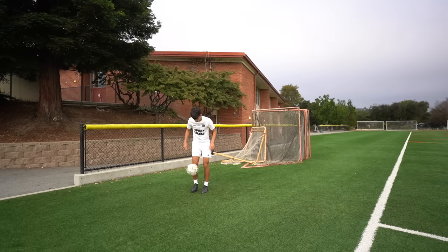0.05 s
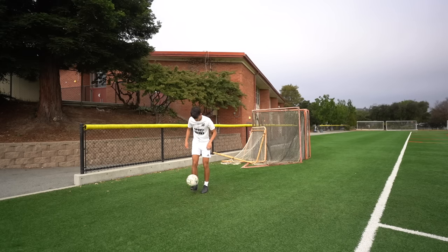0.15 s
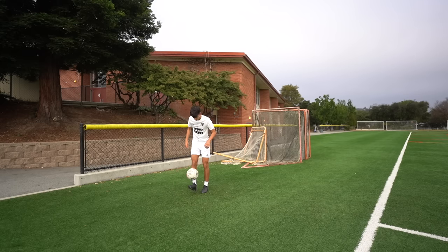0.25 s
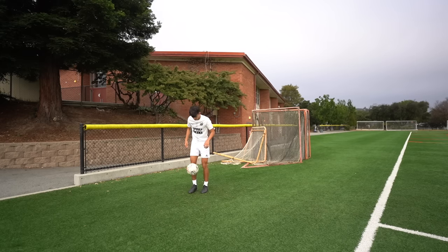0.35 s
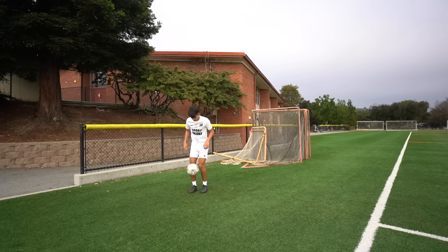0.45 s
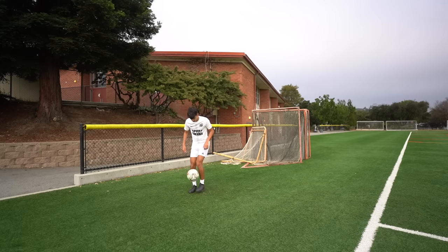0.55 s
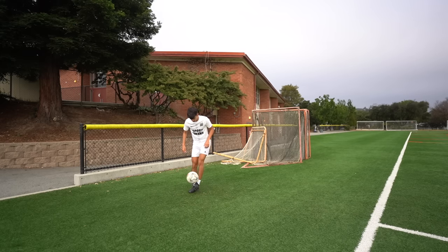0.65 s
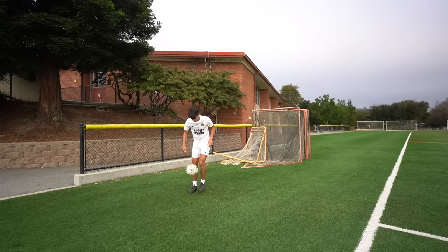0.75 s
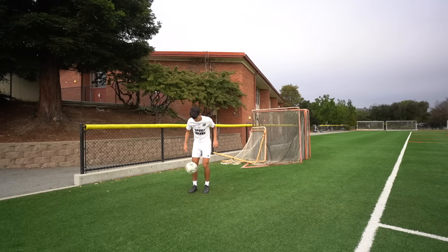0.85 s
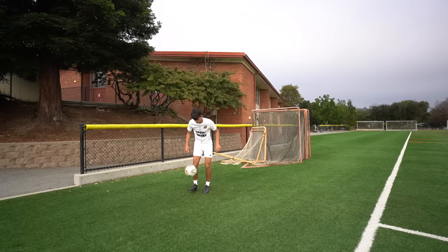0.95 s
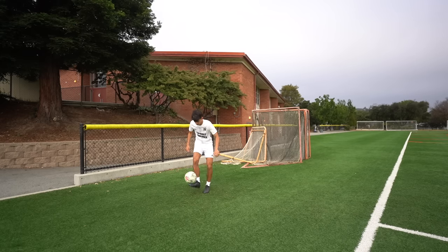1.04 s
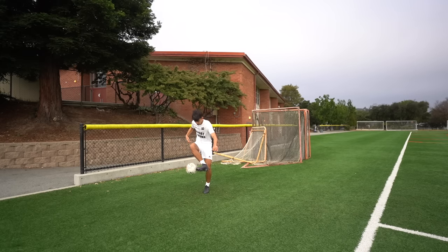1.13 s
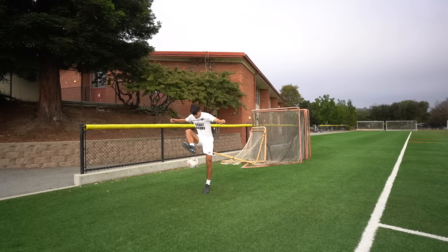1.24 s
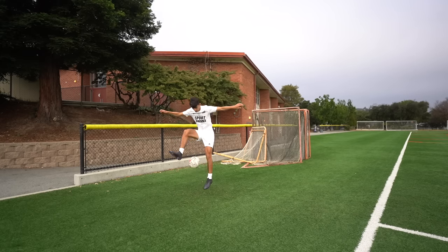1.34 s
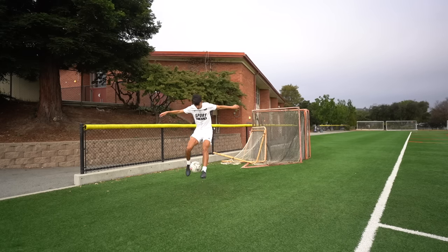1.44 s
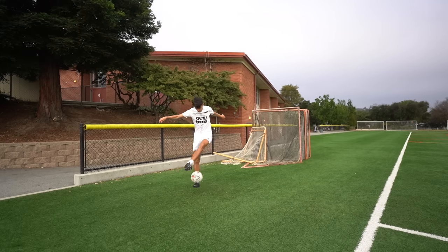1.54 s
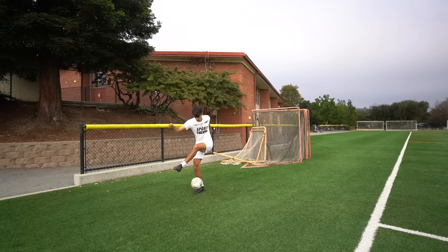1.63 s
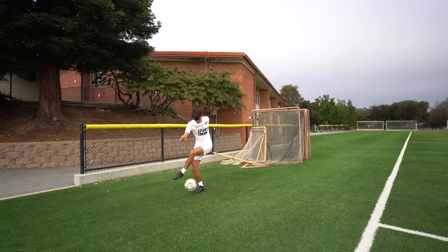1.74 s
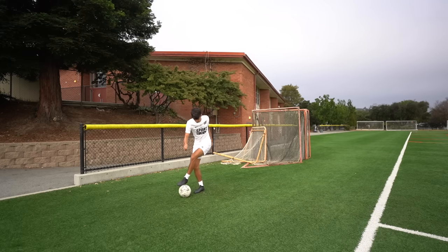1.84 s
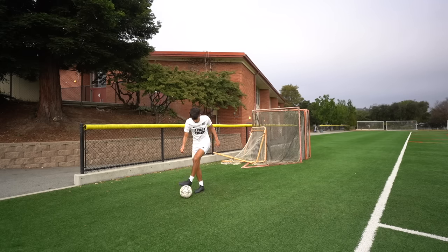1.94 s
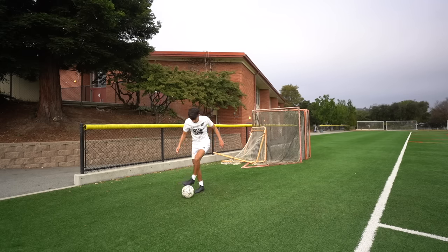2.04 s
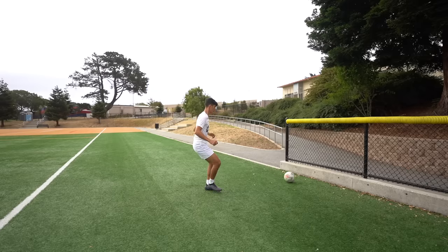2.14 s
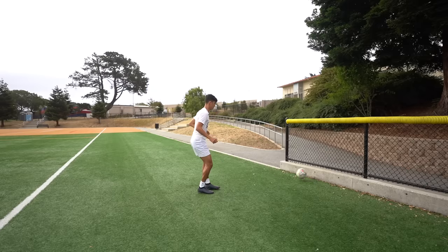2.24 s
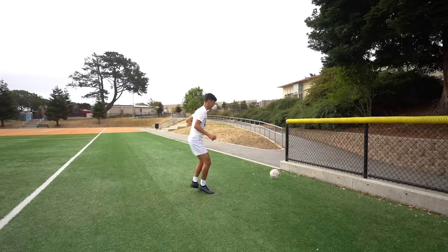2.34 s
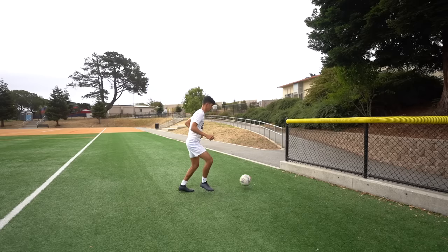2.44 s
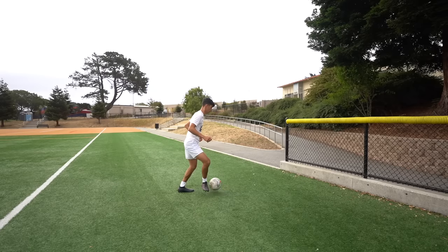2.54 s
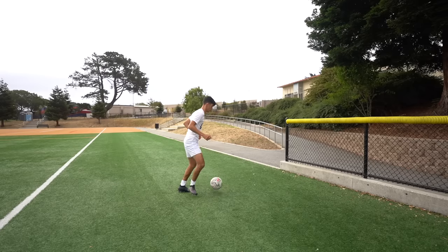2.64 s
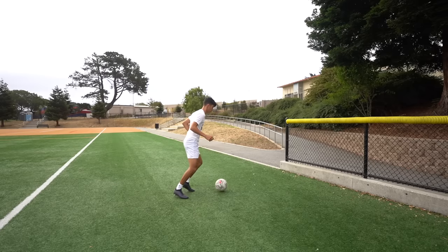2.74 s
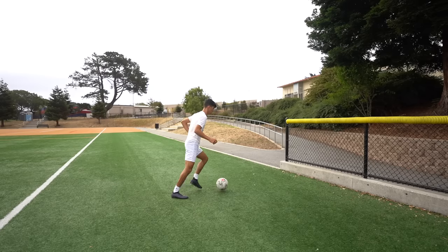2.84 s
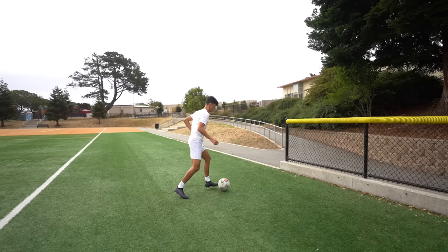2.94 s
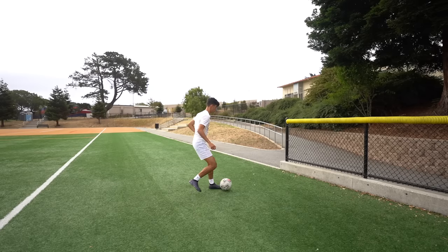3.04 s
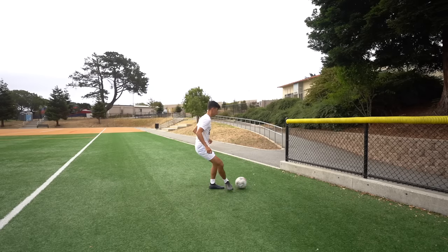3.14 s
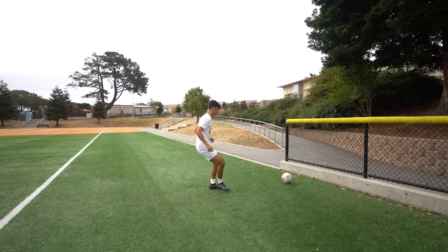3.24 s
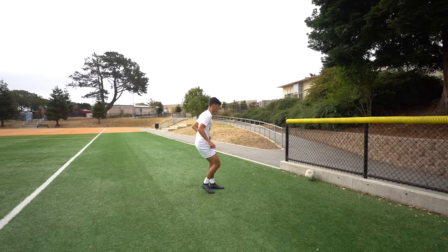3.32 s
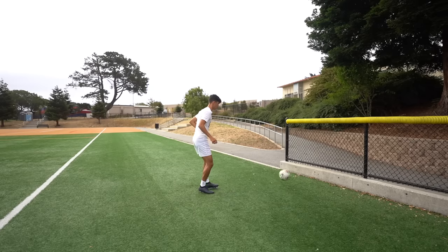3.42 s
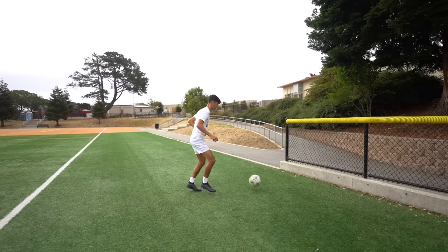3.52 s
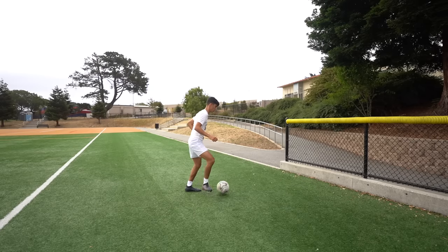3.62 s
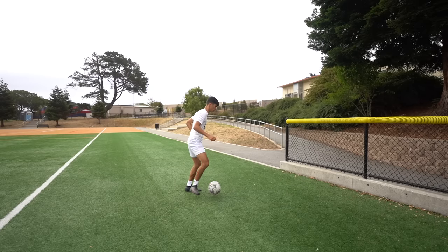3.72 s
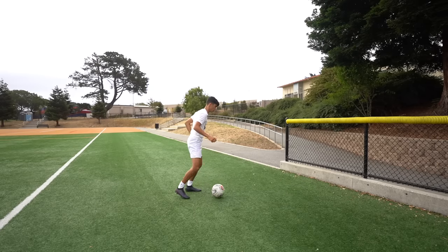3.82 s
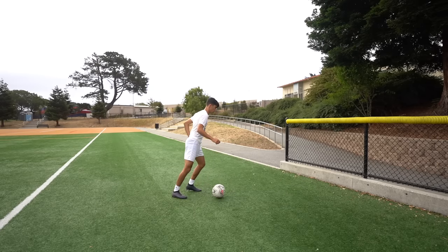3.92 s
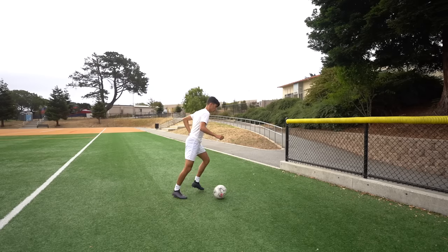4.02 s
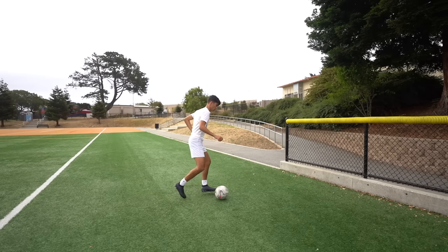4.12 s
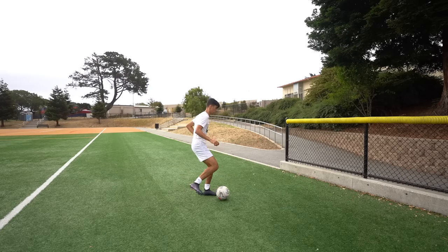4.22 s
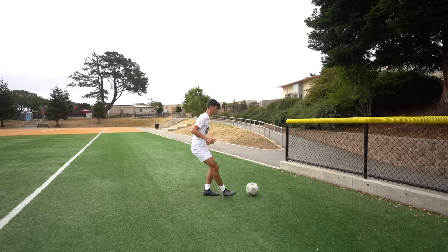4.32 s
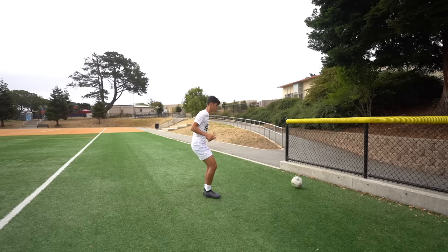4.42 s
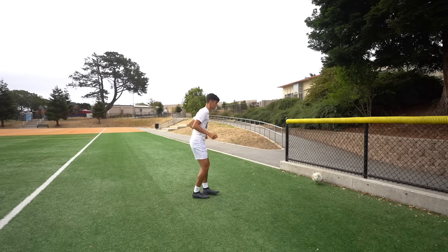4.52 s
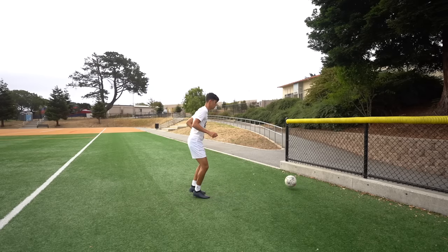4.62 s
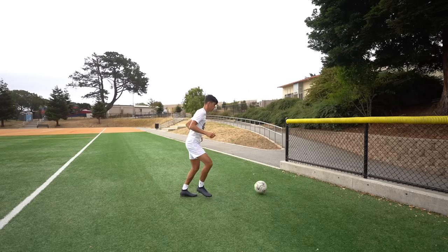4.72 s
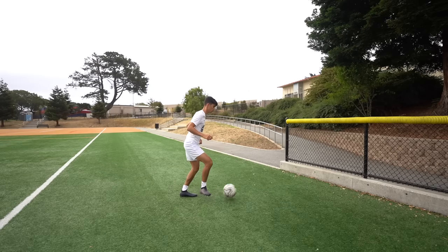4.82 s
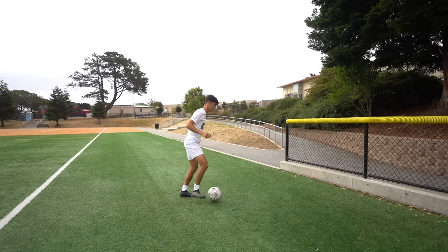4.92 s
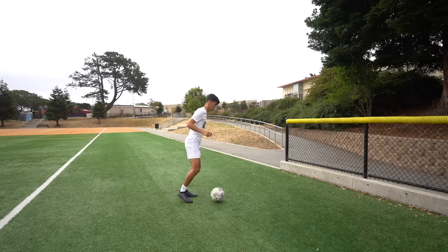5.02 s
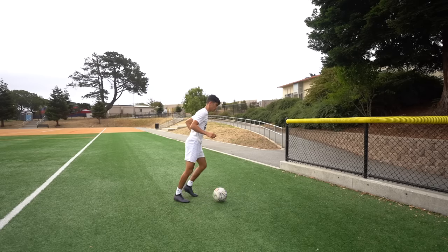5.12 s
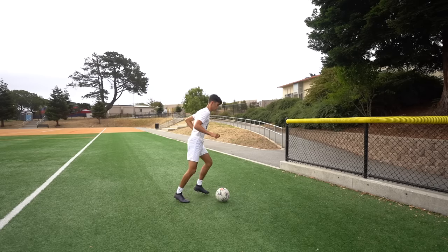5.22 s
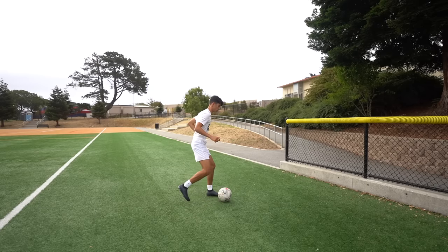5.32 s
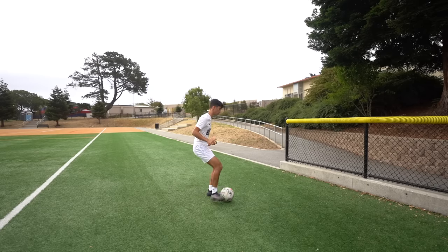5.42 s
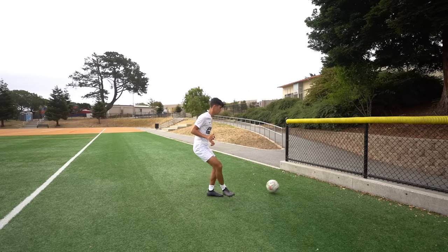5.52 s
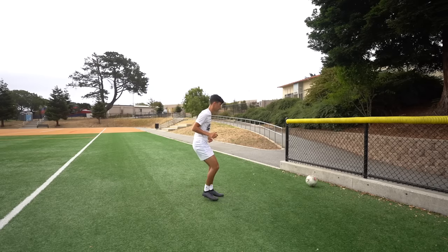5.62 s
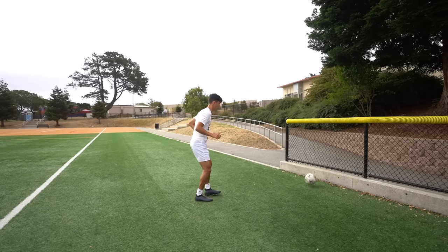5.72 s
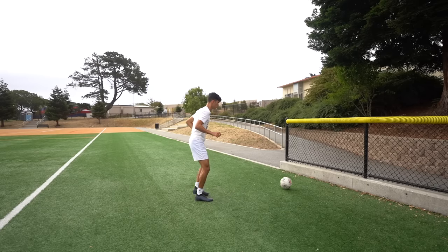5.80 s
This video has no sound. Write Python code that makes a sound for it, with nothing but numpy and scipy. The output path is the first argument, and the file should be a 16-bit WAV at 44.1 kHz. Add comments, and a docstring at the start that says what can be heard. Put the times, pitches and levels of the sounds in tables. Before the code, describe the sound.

For the first two seconds, low gusts of wind buffet the microphone on an outdoor pitch while clothes rustle faintly. A soccer ball is juggled with quiet, bright taps at about 0.2, 0.7, 1.1, 1.7 and 1.9 seconds. At 2.1 seconds the wind stops abruptly and much louder passing begins. The ball smacks a concrete kerb to the right at about 2.3, 3.4, 4.6 and 5.7 seconds, each time setting a chain-link fence ringing very faintly. Nearer the centre, a foot traps the rebounds at 2.6, 3.7 and 4.9 seconds and kicks the ball back at 3.2, 4.3 and 5.5 seconds. Each contact is a sharp crack with a low thump and a short hollow ring. Between them, shoes and ball softly brush and crunch the artificial turf. A faint murmur of distant traffic continues throughout.

```python
"""A soccer ball is juggled on artificial turf in gusty wind; then, after a cut to a second spot, it is
passed against a concrete kerb under a chain-link fence and trapped on each rebound. Every contact is
a crack of the skin, a thump of the flattening ball and a short ring of its air and shell. The fence
rings faintly; shoes and ball brush plastic blades and crunch the infill. Gusts buffet the microphone
and clothes rustle during the juggling only; a distant town murmurs throughout."""
import sys
import numpy as np
from scipy import signal
from scipy.fft import rfft, irfft
from scipy.io import wavfile
from scipy.ndimage import uniform_filter1d

SR = 44100
rng = np.random.default_rng(int(sys.argv[2]) if len(sys.argv) > 2 else 0)


def wav_record(signal):
    """Record a signal, one row per channel, as 16-bit PCM in the file named by sys.argv[1]."""
    frames = np.transpose(np.atleast_2d(signal))
    bounded = np.clip(frames, -1, 1)
    # unit amplitude maps onto the largest positive 16-bit level
    quanta = np.round(bounded * 32767).astype(np.int16)
    wavfile.write(sys.argv[1], SR, quanta)


N = 258426
TIME = np.arange(N) / SR
AGE = TIME[:SR // 2]  # seconds since a contact
CUT_S = 2.107  # juggling ends, passing begins

# ball on the kerb: start_s, crack_db, centre_hz, treble_db, thump_db, thump_hz, pan_db
REBOUNDS = [(2.2682, -2.5, 2180, 1, -18, 128, -9.0), (3.376, -3, 2230, 0, -17.5, 133.2, -11),
            (4.5652, -4.5, 2350, 2.5, -17.5, 137, -13.5), (5.7334, -2, 2200, 1.5, -18.5, 128, -10)]


def juggling():
    """Light touches keep the ball up: quiet, bright ticks with only the highest fizz rolled off."""
    # start_s, crack_db, centre_hz, treble_db, thump_db, thump_hz, pan_db
    juggles = [(.2261, -23, 3300, 9, -33, 122, 0), (.676, -21, 1960, 10, -27.5, 116, -1),
               (1.1044, -17, 1760, 6, -40, 124, -1), (1.668, -27, 3100, 7, -37.5, 152, 0),
               (1.897, -30.5, 2940, 19, -50, 125, -2)]
    taps = touches(juggles, crack_db=2.5, thump_db=1.5, modes_db=2, snap_db=4, echo_s=0.0264,
                   echo_db=-25, peel_db=-51, scatter_db=-36, scatter_t60=0.16, low_pan_db=6, width=0.5)
    return signal.sosfilt(signal.butter(1, 8000, fs=SR, output="sos"), taps)


def passing():
    """The foot passes and traps the ball, and its panels flap."""
    # start_s, crack_db, centre_hz, treble_db, thump_db, thump_hz, pan_db
    kicks = [(2.6156, -8, 2540, 2.5, -25.5, 106, -3), (3.176, -4.5, 1600, 4.5, -19, 109, -3),
             (3.7196, -7, 1790, 4.5, -23.5, 107.7, -2.5), (4.3329, -5, 3180, 6, -16, 108, -3),
             (4.9318, -6.5, 1720, -3.5, -24.5, 110.6, -2), (5.4936, -5.5, 1510, 0.5, -19.5, 106, -4.5)]
    hits = touches(kicks, crack_db=0.5, thump_db=8, modes_db=-6, snap_db=-9, echo_s=.029, echo_db=-13,
                   peel_db=-39.5, scatter_db=-51, scatter_t60=0.53, low_pan_db=-1.5, width=0.28)
    return hits + leather(kicks, db=-14, length_s=0.0086)


def kerb_hits():
    """The ball smacks into concrete, off to the right."""
    return touches(REBOUNDS, crack_db=-4.5, thump_db=9.5, modes_db=-4.5, snap_db=-7, echo_s=.018,
                   echo_db=-13.5, peel_db=-32, scatter_db=-43.5, scatter_t60=0.45, low_pan_db=-3.5,
                   width=0.5)


def touches(table, crack_db, thump_db, modes_db, snap_db, echo_s, echo_db, peel_db, scatter_db,
            scatter_t60, low_pan_db, width):
    """Layer a crack, inner ring and thump per contact; their dB settings trim the table's levels."""
    # air and shell of the ball: pitch_hz, level_db, t60_s
    ball_modes = [(201.2, -21, 0.18), (277.2, -13.5, 0.089), (365, -13, 0.015), (435, -16.5, 0.031),
                  (585, -22, 0.032), (1207, -56, 0.035), (1624, -13, 0.018), (2100, -48, 0.012),
                  (2800, -47, 0.014)]
    out = np.zeros((2, N))
    for s, db, centre_hz, treble_db, low_db, low_hz, pan_db in table:
        skin = skin_click(centre_hz, treble_db, focus_db=6, size=512)
        slap = crack(skin, 1.19 / low_hz, peel_db, scatter_db, scatter_t60, width)
        slap = np.array([delayed(slap[0], 1 / SR), slap[1]])  # reaches the left a moment later
        inner = ring(ball_modes, spread=0.041) * pan(pan_db / 2)
        add(out, s, (undb(crack_db) * slap * pan(pan_db) + undb(modes_db) * inner) * undb(db))
        add(out, s, undb(low_db + thump_db) * thump(low_hz, snap_db, echo_s, echo_db, low_pan_db))
    return out


def skin_click(centre_hz, treble_db, focus_db, size):
    """The skin clicks: the spot that is hit lifts one resonance; a treble shelf sets the brightness."""
    # tone of the slapped skin: freq_hz, level_db
    skin_eq = [(250, -2), (600, -21), (950, -5.5), (1300, 0), (1650, 0), (2300, -0.5), (3100, -2.5),
               (3700, -10), (5000, -7.5), (7000, -12), (11000, -16.5), (16000, -21.5)]
    hz = np.fft.rfftfreq(size, 1 / SR) + 1
    db = over_bins(skin_eq, size) + focus_db * np.exp(-(np.log2(hz / centre_hz) / 0.2) ** 2)
    db += treble_db * np.clip(np.log2(hz / 2000), 0, 1)
    cepstrum = irfft(np.log(undb(db)))
    click = irfft(np.exp(rfft(2 * cepstrum[:size // 2], size)))  # minimum phase: a sharp attack
    return click / np.abs(click).max()


def crack(skin, release_s, peel_db, scatter_db, scatter_t60, width):
    """The skin slaps, patters as the contact spreads and peels off; the surroundings scatter it."""
    patter = undb(-20) * (np.exp(-AGE / .0014) + .25 * np.exp(-AGE / .004))
    peel = undb(peel_db) * np.exp(-((AGE - release_s) / 0.002) ** 2)
    texture = rng.standard_normal(len(AGE)) + width * rng.standard_normal((2, len(AGE)))
    push = (patter + peel) * texture
    push[:, 0] += .5  # the slap itself
    push[:, int(.0005 * SR)] += .25  # its reflection off the ground
    push += undb(scatter_db - 60 * AGE / scatter_t60) * rng.standard_normal((2, len(AGE)))
    sound = signal.fftconvolve(push, skin[None], axes=1)[:, :len(AGE)]
    attack_rms = np.sqrt(np.mean(sound[:, :SR // 500] ** 2))
    return -0.28 * sound / attack_rms


def thump(hz, snap_db, echo_s, echo_db, pan_db):
    """The ball flattens, springs back and snaps round; the wall returns a thin echo."""
    turns = np.maximum(AGE - .0014, 0) * hz
    flex = np.sin(2 * np.pi * turns) * np.exp(-np.maximum(turns - 1.3, 0) / 0.44)
    # the ball regains its volume, so no net air is pushed out
    swell = np.exp(-((turns - .9) / 2) ** 2)
    flex -= swell * flex.sum() / swell.sum()
    snap = undb(snap_db) * np.exp(-np.abs(turns - 1.22) / 0.13) * np.cos((turns - 1.22) * 15)
    direct = np.array([flex, delayed(flex, 0.00016)]) * pan(pan_db) + snap * pan(-8.5)
    thin = signal.sosfilt(signal.butter(2, 130, "high", fs=SR, output="sos"), flex + snap)
    return direct + undb(echo_db) * delayed(thin, echo_s) * pan(-8.5)


def leather(table, db, length_s):
    """The panels flap as the ball leaves the foot, more on a hard kick."""
    # tone of the flap: freq_hz, level_db
    flap_eq = [(150, -11), (330, 6.5), (480, -3.5), (700, 1.5), (1000, -33), (2000, -25.5)]
    drive = np.zeros(N)
    for s, _, _, _, low_db, _, _ in table:
        age = np.maximum(TIME - s, 0) / length_s
        drive += undb(low_db + db) * age * np.exp(1 - age)
    return drive * wide_noise(flap_eq, [(200, 0.76), (1000, 0.54)], [(200, -2), (1000, -6)])


def fence(ring_db, pan_db):
    """Each blow on the kerb sets the fence ringing faintly."""
    # steel mesh: pitch_hz, level_db, t60_s
    fence_modes = [(1211, -8, .3), (1766, -11, .3), (3030, -9, .2), (3098, -4, .55), (3122, -7, .5),
                   (3817, -11, .3), (4700, -13, .25), (6800, -13, .2)]
    out = np.zeros((2, N))
    build_up = 1 - np.exp(-AGE / .016)
    for s, *_ in REBOUNDS:
        add(out, s, ring(fence_modes, spread=0.0013) * build_up * undb(ring_db) * pan(pan_db))
    return out


def turf(crunch_trim_db, roll_trim_db, grain_db, pan_db):
    """Plastic blades flick past shoes and ball in dense grains; the infill crunches under weight."""
    # shoe and ball scuffs: centre_s, half_length_s, hiss_db, crunch_db
    scuffs = [(1.665, .0097, -54.5, -40.5), (2.165, 0.017, -46, -47), (2.448, 0.01, -57, -40),
              (2.553, 0.0073, -45, -44), (2.778, 0.0079, -56, -53), (3.572, 0.0095, -52.5, -39),
              (3.659, 0.0063, -40.5, -34.5), (4.243, 0.0097, -58, -51), (4.529, 0.014, -48, -38.5),
              (4.753, .017, -49.5, -40), (5.107, 0.0079, -65, -44.5), (5.658, 0.013, -41.5, -47)]
    # the ball skims the turf after a low pass: start_s, end_s, level_db
    rolls = [(3.175, 3.403, -47.5), (4.337, 4.56, -48)]
    # plastic blades and rubber infill: freq_hz, level_db
    blade_eq = [(900, -22), (2000, -1), (3300, -2.5), (6000, -1), (10000, -4), (16000, -8.5)]
    infill_eq = [(150, -38), (400, 5), (1000, -6), (2000, -16), (4000, -17), (9000, -36)]
    steps_per_s, hops_per_s, hop_db = 5, 11, 2
    skids = [(s - 0.0069, 0.025, -49.5, -46.5) for s, *_ in REBOUNDS]  # at the foot of the kerb
    step_times = CUT_S + (np.arange(24) + rng.random(size=24)) / steps_per_s
    shuffles = [(s, .035, -63, -54.5) for s in step_times]
    hiss, crunch = np.zeros(N), np.zeros(N)
    for s, half_s, hiss_db, crunch_db in scuffs + skids + shuffles:
        stroke = bell(s, half_s)
        hiss += undb(hiss_db) * stroke
        crunch += undb(crunch_db + crunch_trim_db) * stroke
    for start, end, db in rolls:
        hops = hop_db * np.cos(2 * np.pi * hops_per_s * (TIME - start))  # each presses into the grass
        hiss = np.hypot(hiss, undb(db + roll_trim_db + hops) * (TIME > start) * (TIME < end))
    grains = unit(undb(grain_db * noise([(300, 2), (1500, 7), (4000, -53)])))
    likeness = [(500, 0.97), (3000, 0.45), (12000, 0.076)]
    balance = [(300, -1), (2000, pan_db), (12000, -9.5)]
    blades = hiss * wide_noise(blade_eq, likeness, balance)
    infill = crunch * wide_noise(infill_eq, likeness, balance)
    return grains * (blades + infill)


def wind(gust_db, swirl_db, lag_s, width, rasp_db):
    """Gusts rise, hold and die over a breeze, crossing the left microphone port and then the right."""
    # start_s, hold_s, level_db, swirl_share_db, buffet_share_db
    gusts = [(0.039, .1, -19, -6, -8.5), (0.246, 0.0084, -22.5, -20, -7), (0.877, 0.012, -28.5, -15, -12),
             (1.146, 0.019, -20.5, -11, -11), (1.505, 0.021, -30.5, -15, -20), (1.619, 0.094, -32, -4, -21),
             (1.804, 0.026, -24, -15, -3), (1.888, .042, -19.5, -27, -11), (1.97, 0.024, -28.5, -25, 3),
             (2.036, .055, -21, -19, -1.5)]
    # gust body, fine turbulence, largest eddies and edge rasp: freq_hz, level_db
    gust_eq = [(20, -24), (45, -10.5), (68, -7), (90, 0), (115, -3), (150, -3.5), (220, -12.5),
               (400, -29.5), (800, -42.5), (2000, -86)]
    swirl_eq = [(80, -14), (200, 13), (330, 7), (520, -2.5), (800, -25), (1200, -36), (2500, -70)]
    buffet_eq = [(25, -24), (50, -9), (64, 4), (80, -7), (160, -40), (600, -89)]
    rasp_eq = [(300, -11), (600, 8.5), (900, -8), (1400, -17.5), (3000, -55)]
    attack_s, release_s, breeze_db, breeze_swirl_db = 0.025, .016, -41, -57
    flow, fine, deep = undb(breeze_db), undb(breeze_swirl_db), 0
    for start, hold, db, fine_db, deep_db in gusts:
        rise = np.exp(-np.maximum(start - TIME, 0) / attack_s)
        fall = np.exp(-np.maximum(TIME - start - hold, 0) / release_s)
        gust = undb(db) * rise * fall
        flow = np.hypot(flow, gust)
        fine = np.hypot(fine, gust * undb(fine_db))
        deep = np.hypot(deep, gust * undb(deep_db))
    air, side = (undb(gust_db) * flow * eddies(gust_eq)
                 + undb(swirl_db) * fine * eddies(swirl_eq)
                 + deep * eddies(buffet_eq) for _ in range(2))
    ports = np.array([air, delayed(air, lag_s)]) + width * side * np.array([[1], [-1]])
    # the strongest pushes tear at the edge of the port
    return ports + undb(rasp_db) * fine / flow * ports ** 2 * noise(rasp_eq)


def eddies(colour, life_s=0.024, evenness=0.43):
    """Turbulence as a chain of eddies of similar strength, rms 1."""
    air = noise(colour)
    power = uniform_filter1d(np.abs(signal.hilbert(air)) ** 2, int(life_s * SR))
    return unit(air / power ** (evenness / 2))


def clothes(rest_db, rise_db, liveliest_s):
    """Shirt, shorts and shoes rustle, swelling around the liveliest move."""
    # tone of the fabric: freq_hz, level_db
    cloth_eq = [(500, -20), (1300, 12.5), (2500, 1.5), (5500, -4.5), (9000, -15), (16000, -14)]
    movement = undb(rest_db + rise_db * bell(liveliest_s, half_s=0.75))
    return movement * np.array([noise(cloth_eq), noise(cloth_eq)])


def town(at_kerb, db):
    """Far traffic and trees from either spot: the bed creeps up to the cut, then swells once."""
    # tone of the bed: freq_hz, level_db
    field_eq = [(15, -31), (25, 0), (82, -1), (149, -9), (200, -20), (263, -19), (754, -22), (818, -22),
                (1330, -26), (1610, -29), (2050, -30), (3720, -41.5), (5140, -45), (16000, -53.5)]
    kerb_eq = [(15, -40), (25, -16), (64, 4), (200, -0.5), (344, -10), (911, -15), (1020, -18),
               (1130, -16.5), (1370, -20), (1650, -20), (2110, -25), (2910, -26), (6560, -35.5),
               (13600, -41.5), (16000, -46)]
    # likeness of the channels: freq_hz, correlation
    field_likeness = [(60, 1), (290, 0.95), (640, 0.62), (1400, 0.05), (3100, -0.76), (7000, 0.064)]
    kerb_likeness = [(60, 1.0), (130, 1), (290, 0.95), (640, 0.7), (1410, 0.45), (3100, -0.036),
                     (6820, 0.013), (15000, -0.084)]
    # stereo balance: freq_hz, pan_db
    field_balance = [(200, 0.5), (380, 1.5), (700, 7.5), (1300, -1), (2400, -1.5), (8000, 0.5)]
    kerb_balance = [(60, -0.5), (110, 0), (200, -1.5), (380, -3), (700, -5.5), (1290, -8), (2380, -7),
                    (4400, -3.5), (8120, -3), (15000, 0)]
    if at_kerb:
        bed = wide_noise(kerb_eq, kerb_likeness, kerb_balance)
    else:
        bed = wide_noise(field_eq, field_likeness, field_balance)
    rise_db_per_s, swell_db = 1.5, 1.66
    drift_db = rise_db_per_s * np.minimum(TIME - CUT_S, 0) + swell_db * bell(4.38, half_s=0.64)
    return bed * undb(db + drift_db)


def ring(modes, spread):
    """Decaying modes, detuned a little on every blow."""
    return sum(undb(db - 60 * AGE / t60)
               * np.sin(2 * np.pi * hz * (1 + spread * rng.standard_normal()) * AGE)
               for hz, db, t60 in modes)


def noise(colour):
    """Noise shaped by (freq_hz, level_db) points, rms 1."""
    return unit(irfft(rfft(rng.standard_normal(N)) * undb(over_bins(colour, N)), N))


def wide_noise(colour, likeness, balance):
    """Stereo noise with likeness (freq_hz, correlation) and balance (freq_hz, pan_db)."""
    correlation, tilt_db = np.clip(over_bins(likeness, N), -1, 1), over_bins(balance, N)
    mid = rfft(noise(colour)) * np.sqrt(1 + correlation)
    side = rfft(noise(colour)) * np.sqrt(1 - correlation)
    out = irfft(np.array([(mid + side) * undb(tilt_db / 2), (mid - side) * undb(-tilt_db / 2)]), N)
    return out / np.std(out.mean(axis=0))


def over_bins(points, size):
    """Read (freq_hz, value) points at every bin of a transform."""
    hz, value = np.transpose(points)
    return np.interp(np.log(np.fft.rfftfreq(size, 1 / SR) + 1), np.log(hz), value)


def bell(s, half_s):
    """A smooth rise and fall around time s, top 1."""
    return np.exp(-((TIME - s) / half_s) ** 2 / 2)


def delayed(x, lag_s):
    """The same sound, a little later."""
    t = TIME[:len(x)]
    return np.interp(t - lag_s, t, x, left=0)


def add(out, s, x):
    """Mix a stereo sound in at time s."""
    i = int(s * SR)
    out[:, i:i + x.shape[1]] += x[:, :N - i]


def pan(db):
    """Channel gains for left minus right in dB."""
    return undb(np.array([[db], [-db]]) / 2)


def undb(db):
    """Decibels to gain."""
    return 10 ** (np.asarray(db) / 20)


def unit(x):
    """Scale to rms 1."""
    return x / np.sqrt(np.mean(x ** 2))


def scene():
    """Juggling in the wind, then passing against the kerb."""
    before_cut = np.clip((CUT_S - TIME) * SR / 128, 0, 1)  # 3 ms crossfade
    gusts = wind(gust_db=1, swirl_db=3.5, lag_s=0.00054, width=0.39, rasp_db=-9)
    ambience = town(at_kerb=False, db=-34) + clothes(rest_db=-58, rise_db=7, liveliest_s=1.68) + gusts
    out = before_cut * ambience + (1 - before_cut) * town(at_kerb=True, db=-37)
    out += juggling() + passing() + kerb_hits()
    out += fence(ring_db=-43.5, pan_db=-5)
    return out + turf(crunch_trim_db=2, roll_trim_db=0.5, grain_db=3, pan_db=-3.5)


def record(dry):
    """Clip the peaks at full scale and cut the top."""
    top_hz = 15950
    return signal.sosfilt(signal.ellip(8, .2, 70, top_hz, fs=SR, output="sos"), np.clip(dry, -1, 1))


dry = scene()
out = record(dry)
wav_record(out)
```